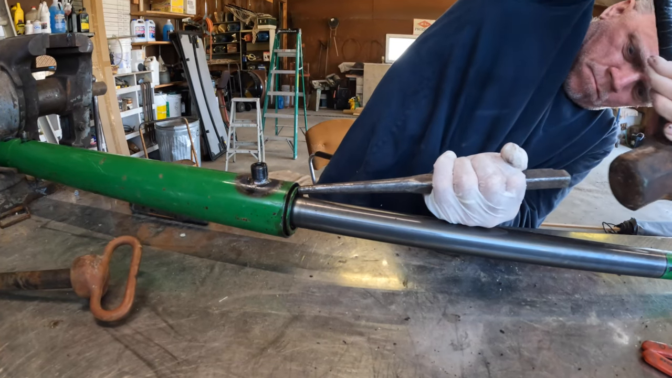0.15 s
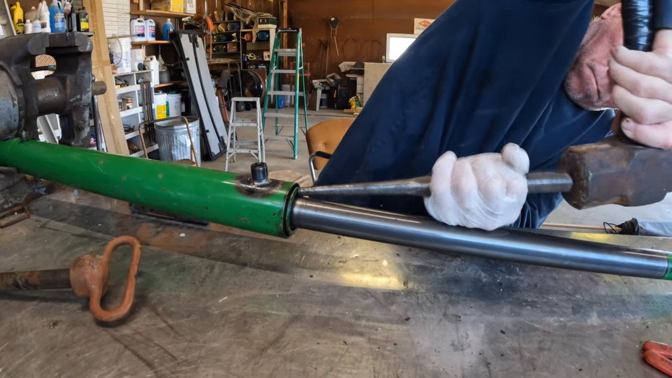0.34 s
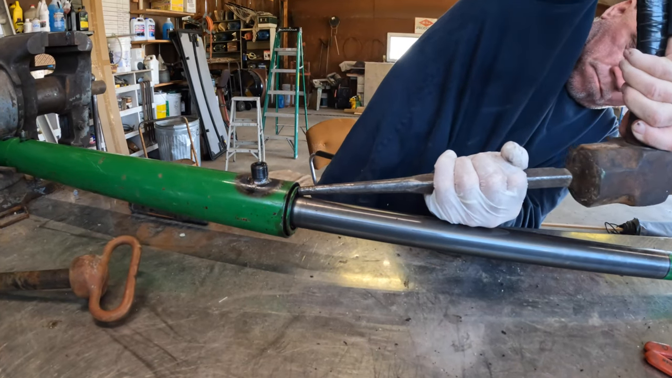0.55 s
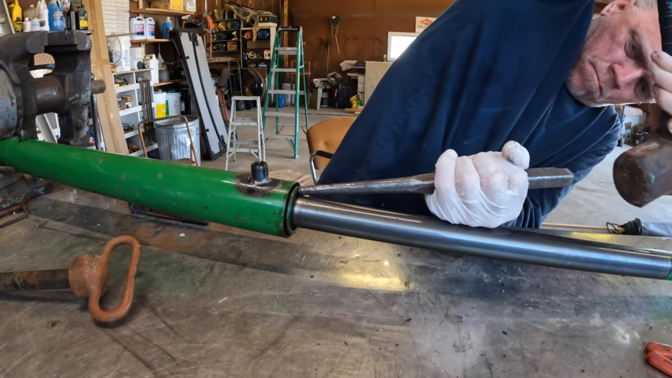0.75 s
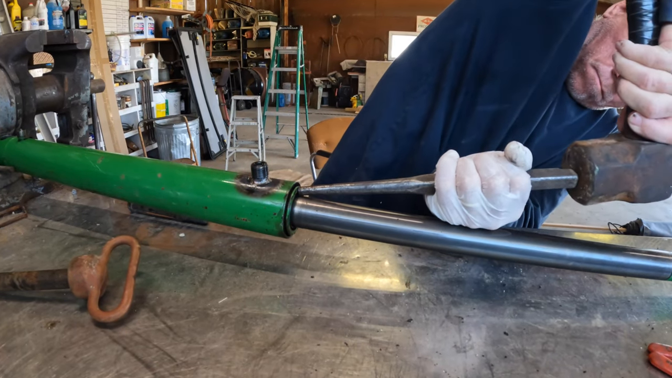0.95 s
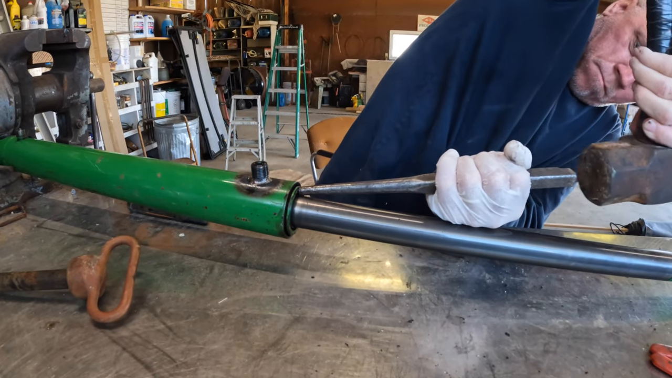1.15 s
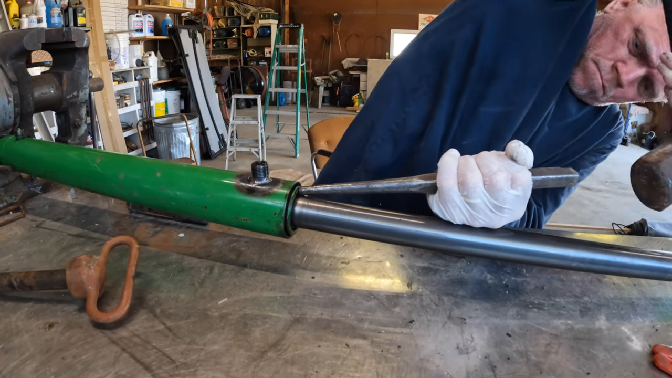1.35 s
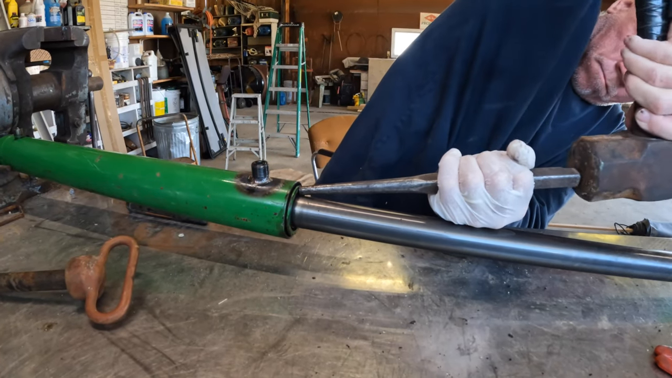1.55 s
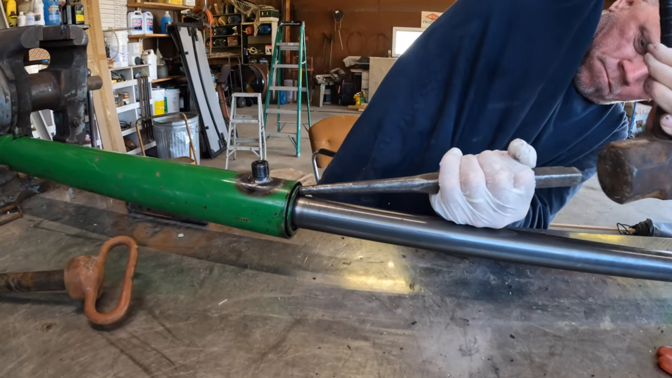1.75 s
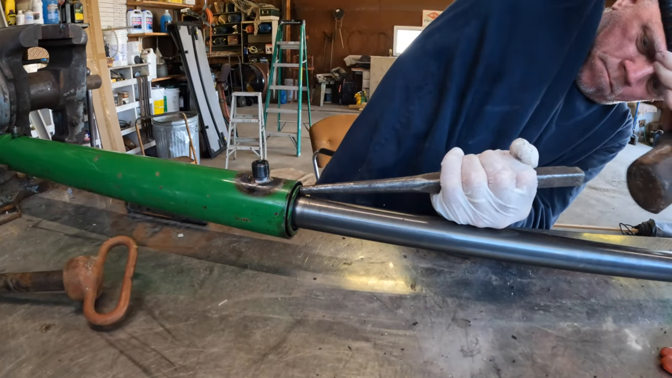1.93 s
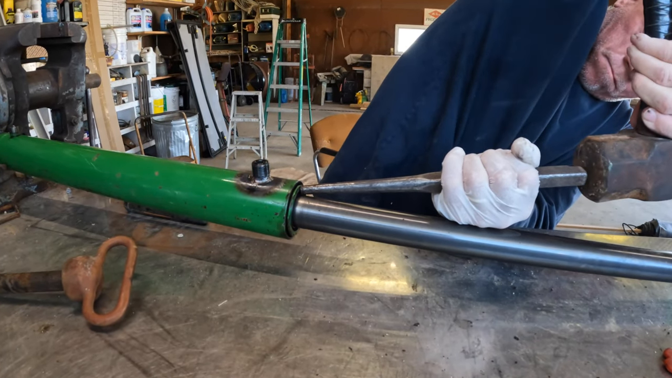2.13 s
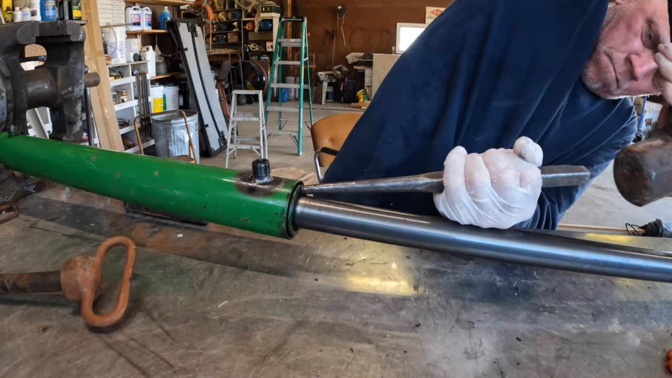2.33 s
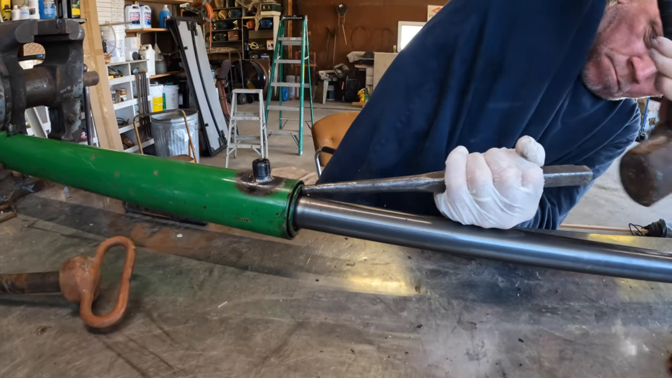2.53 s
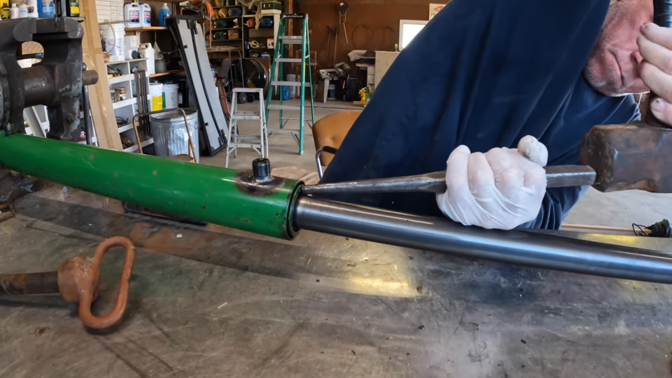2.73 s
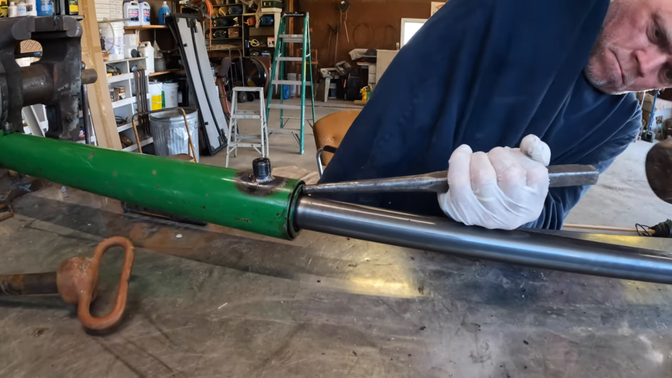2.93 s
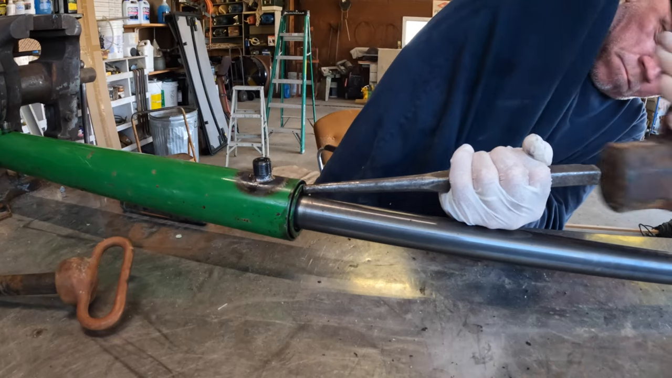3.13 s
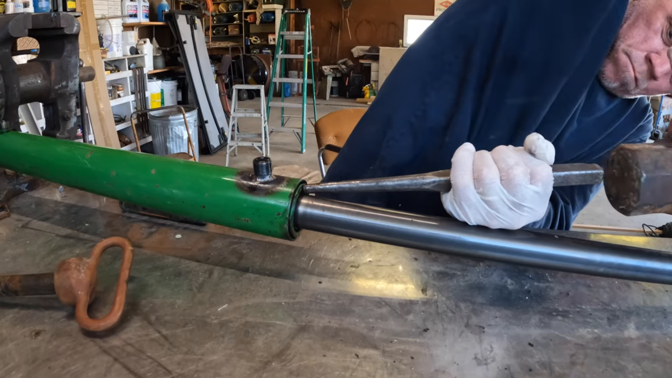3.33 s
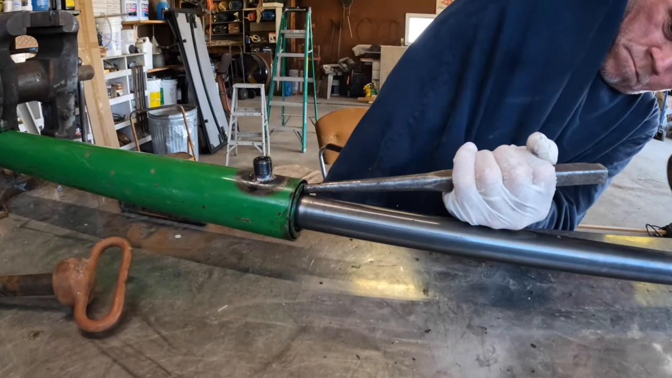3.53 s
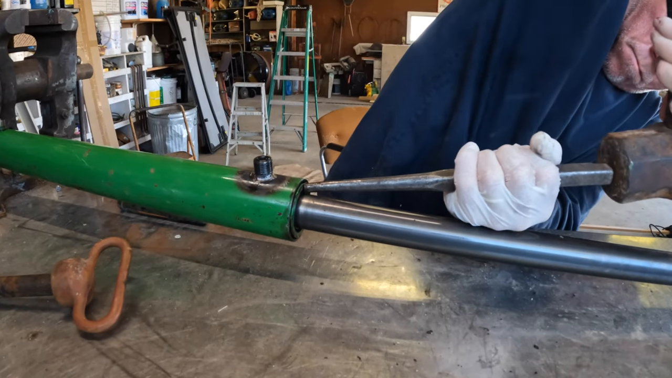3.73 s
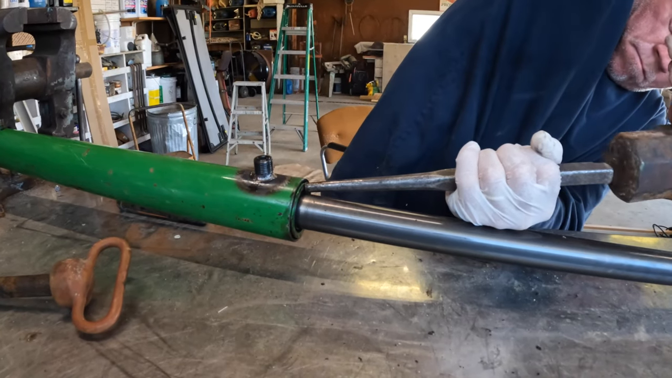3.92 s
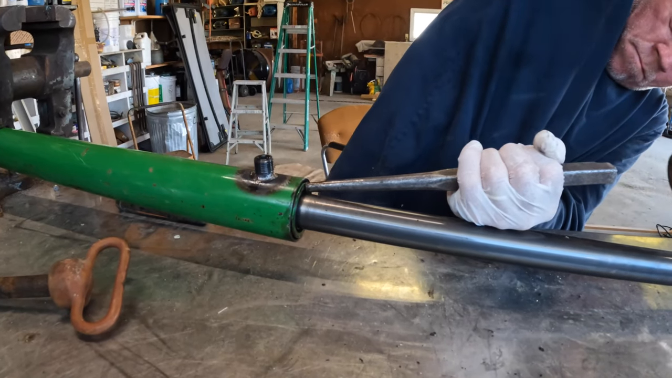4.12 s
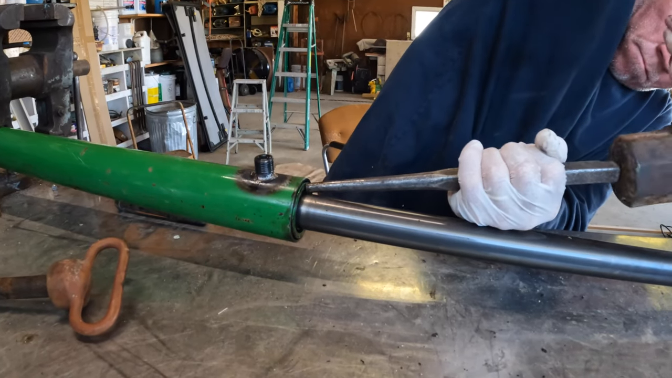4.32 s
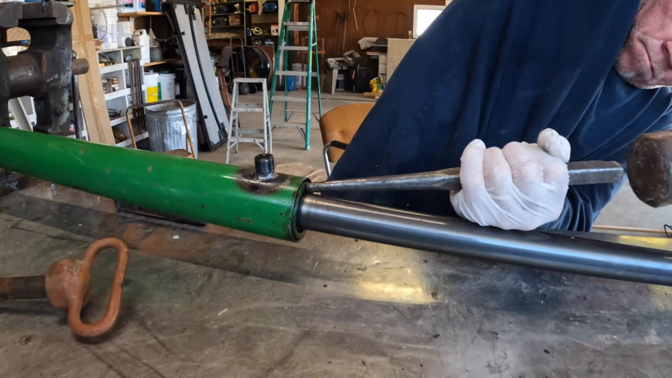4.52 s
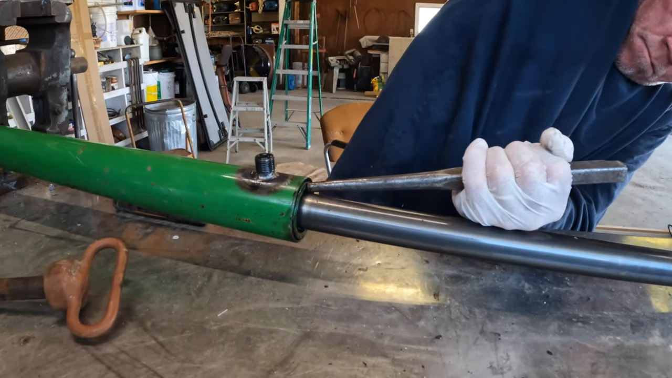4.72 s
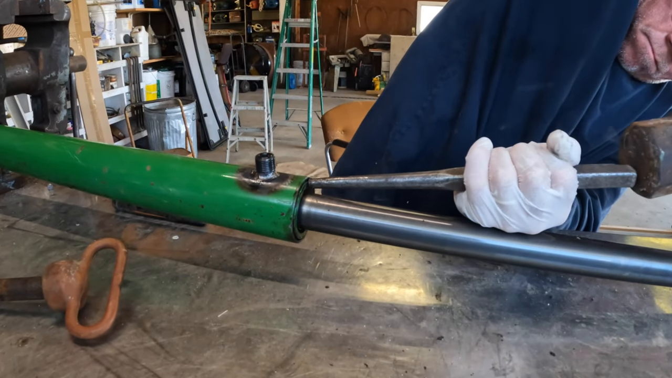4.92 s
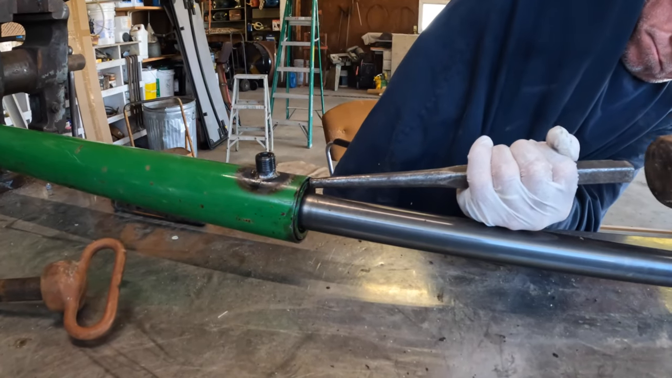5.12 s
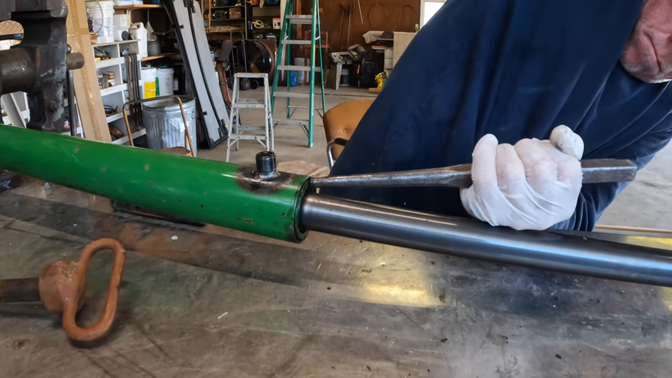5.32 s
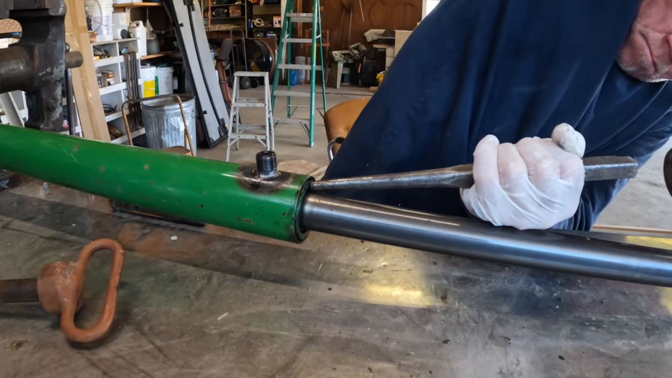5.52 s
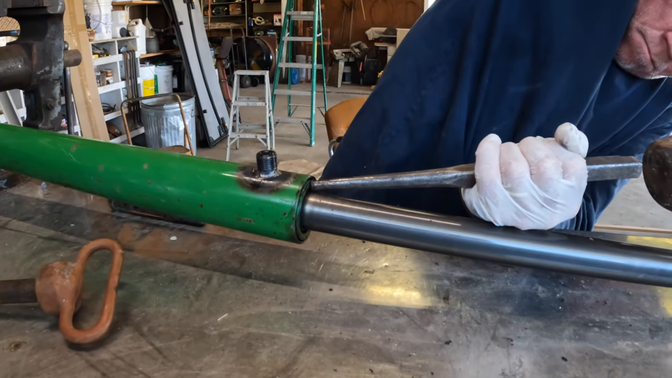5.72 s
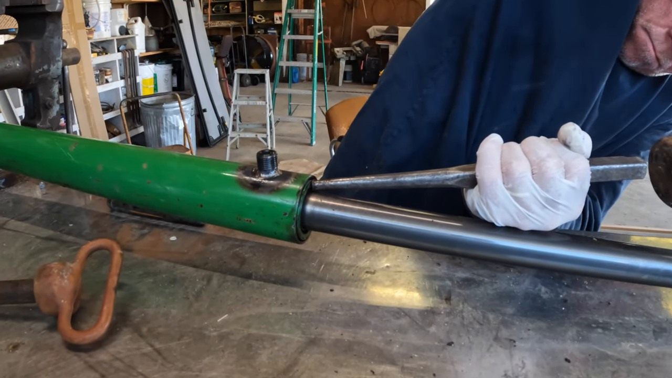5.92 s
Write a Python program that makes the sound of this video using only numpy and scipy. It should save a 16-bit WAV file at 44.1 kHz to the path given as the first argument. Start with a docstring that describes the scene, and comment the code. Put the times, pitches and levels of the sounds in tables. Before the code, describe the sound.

Steady, hard metal-on-metal blows ring and thud on a bench in a large echoing shop, finishing with a faint scrape and a small tap.

```python
"""Large workshop, at a bench: a heavy hammer drives a hand-held steel punch against a hydraulic cylinder's collar.
Each blow is a short noise crack and clank, damped steel modes and a low bench thud; the last is one light tap.
Decaying stereo noise makes the shop's echo, which swells as the recorder's limiter lets go after each blow.
Faint filtered noise adds hammer swish, a scrape of the punch tip before the tap, and the shop's air."""
import sys
import numpy as np
from scipy import signal
from scipy.fft import rfft, irfft, next_fast_len
from scipy.io import wavfile
from scipy.ndimage import uniform_filter1d, minimum_filter1d, map_coordinates

SR = 44100
rng = np.random.default_rng(int(sys.argv[2]) if len(sys.argv) > 2 else 0)


def log_audio(samples):
    """Write samples as a 16-bit WAV file to the path given in sys.argv[1]."""
    # one column per channel
    frames = np.atleast_2d(samples).T
    # limit to full scale, then quantise
    limited = np.clip(frames, -1, 1)
    pcm = np.round(limited * 32767).astype(np.int16)
    wavfile.write(sys.argv[1], SR, pcm)


N = 262836
AGE_S = np.arange(3 * SR // 2) / SR  # time since a blow

# hammer blows: (time [s], force [dB], punch ring [dB], favoured pitch [Hz], its boost [dB])
BLOWS = [(-.085, 4.5, -12, 1100, 4.5), (0.4963, 5.5, 4.5, 7030, 1), (1.0618, 6, -2.5, 10140, 7),
         (1.6145, 6.5, -3.5, 6630, 0.5), (2.1588, 4.5, 1.5, 8850, 2.5), (2.7312, 5, -3.5, 7500, 4),
         (3.2901, 5, 0.5, 8060, 4.5), (3.8490, 5, -1, 5600, 1.5), (4.427, 6, -2.5, 3370, 2),
         (4.9960, 5, 2, 5130, 2), (5.6492, -21.5, -14, 8500, 10)]
# steel-on-steel contact: (frequency [Hz], relative density [dB per Hz])
CRACK = [(200, -17), (900, -10.5), (1700, -9.5), (2450, 0), (3000, -6.5), (4200, -1), (5350, 2.5),
         (6050, -6), (6950, -0.5), (8400, -16), (10000, -19.5), (11000, -29.5), (15500, -29.5)]
# quickly damped clank of barrel and collar: (frequency [Hz], relative density [dB per Hz])
CLANK = [(150, -0.5), (420, 8.5), (560, -0.5), (1300, 3), (1950, -6), (2420, -4), (3000, -7.5), (4300, -5),
         (5300, -9.5), (7200, -5.5), (8600, -18), (10500, -26.5), (14000, -47)]
# clear ring of the punch: (frequency [Hz], mean level [dB], t60 [s])
PUNCH = [(3492, -34.5, .34), (12758, -71, .3), (13436, -62, .26)]
# collar and rod, damped by the bench: (nominal frequency [Hz], mean level [dB], t60 [s])
COLLAR = [(1348, -38.5, 0.18), (1643, -37.5, 0.17), (2410, -40, 0.11), (2453, -37, .11), (3740, -39.5, .11),
          (4230, -41, 0.16), (5170, -38.5, 0.14), (5260, -39.5, .13), (6770, -42.5, .14),
          (7900, -36.5, 0.048), (9930, -51, .14)]
# nearby steel at the two microphone ports: (frequency [Hz], left over right [dB])
PORTS = [(500, 1), (1400, 1), (2500, -1.5), (5000, -2.5), (7600, -2), (9900, 7), (11500, -2), (15000, -6)]
# bench top under the cylinder: (frequency [Hz], relative level [dB], t60 [s])
BENCH = [(170, -16.5, .36), (33, -17.5, .36), (56, -17.5, .34), (76, -20, .36), (91, -18.5, .38),
         (112, -22, .36), (135, -23, .32), (161, -18, .32), (226, -23, .33), (255, -20.5, .32),
         (290, -21, .32), (340, -25, .28), (367, -27, .26), (415, -28, .18)]
# loose things rumbling on the bench: (frequency [Hz], relative density [dB per Hz])
RUMBLE = [(12, -23.5), (30, -4), (90, 2), (170, 2.5), (310, -2), (480, -18.5), (900, -38.5), (2500, -78.5)]
# blow as it spreads all round into the shop: (frequency [Hz], relative density [dB per Hz])
SPREAD = [(200, 4.5), (400, 5.5), (560, 2), (1300, 3.5), (1950, -6.5), (2450, 1), (3050, -7), (4200, 1),
          (5300, -0.5), (6000, -8), (7000, -6.5), (8800, -24), (10200, -22.5), (11600, -35), (16000, -41)]
# workshop decay: (frequency [Hz], t60 [s])
SHOP_T60 = [(50, 2.4), (170, 0.65), (450, 0.85), (1200, 0.75), (3000, 0.75), (5200, 0.67), (8000, 0.52),
            (14000, 0.19)]
# echo width: (frequency [Hz], side over mid [dB])
WIDTH = [(60, -31), (200, -26), (400, -13.5), (1200, -8.5), (2500, -5), (7000, -12), (15000, 5)]
# air rushing round the hammer head: (frequency [Hz], relative density [dB per Hz])
SWISH = [(200, -10), (600, -8), (920, 0), (1300, -12), (4000, -24), (9000, -50)]
# punch tip sliding on the collar: (frequency [Hz], relative density [dB per Hz])
SCRAPE = [(500, -24), (2000, -14), (2450, -11), (3000, -14), (4600, -16), (5200, -4), (5900, -20),
          (12000, -38)]
# still air in the shop: (frequency [Hz], relative density [dB per Hz])
AIR = [(20, -7.5), (90, -2), (300, -11), (1000, -29), (5000, -30.5), (9000, -45.5), (14000, -70)]

FULL_FORCE_DB = 5  # full swing of the hammer
SEAT_TILT_DB_PER_OCTAVE, SEAT_OCTAVES = -0.56, .26  # tilt of a full blow; width of the favoured band
THIN_DB_PER_OCTAVE = 0.06  # extra treble tilt per dB short of a full swing
RING_DB = -1  # steel ring heard directly
THUD_DB, THUD_DB_PER_FORCE_DB = -.1, 0.28  # at a full swing; extra per dB of force
WASH_DB, RING_ECHO_DB, ECHO_LEFT_DB = 4.5, -5.5, 1.7  # echo of the clang, of the ring; left over right
ECHO_DB_PER_FORCE_DB = -0.087  # a light tap leaves relatively more echo


def hammering():
    """Every blow cracks, rings the steel, thuds through the bench and fills the shop, in step with its force."""
    track, thud = np.zeros((2, N)), bench()
    barrel = crowded_modes(depth_db=1.8)
    echo_lean = amp([[ECHO_LEFT_DB / 2], [-ECHO_LEFT_DB / 2]])
    for time_s, force_db, ring_db, pitch_hz, boost_db in BLOWS:
        excess_db = force_db - FULL_FORCE_DB
        seat = seating(force_db, pitch_hz, boost_db)
        ring = coloured(steel(ring_db), seat)
        clang = coloured(contact(), seat)
        direct = panned(clang + amp(RING_DB) * ring, lambda hz: along(PORTS, hz))
        wash = shop_wash(seat, barrel)
        echo = (amp(WASH_DB) * wash + amp(RING_ECHO_DB) * echoed(ring)) * echo_lean
        echo = amp(ECHO_DB_PER_FORCE_DB * excess_db) * echo
        shove = amp(THUD_DB + THUD_DB_PER_FORCE_DB * excess_db) * thud
        add(track, amp(force_db) * (direct + echo + shove), time_s)
    return track


def contact(rise_s=0.00063, crack_db=7.0, crack_t60_s=0.012, clank_db=-14, clank_t60_s=0.078):
    """Hammer, punch and collar chatter for a few milliseconds; the barrel clanks on a little longer."""
    crack = amp(crack_db) * noise(CRACK, side_db=-8.5) * fade(crack_t60_s)
    clank = amp(clank_db) * noise(CLANK, side_db=-7.5) * fade(clank_t60_s)
    return (crack + clank) * swell(rise_s)


def steel(ring_db):
    """The punch keeps its pitch; the collar's modes shift with the way the tip bears on it."""
    punch = amp(ring_db) * ringing(PUNCH, scatter_db=1, detune=0)
    collar = ringing(COLLAR, scatter_db=1.5, detune=.007)
    return punch + collar


def ringing(modes, scatter_db, detune):
    """Damped sines of scattered strength and random phase; detune is the relative spread of pitch."""
    hz, db, t60_s = np.transpose(modes)[:, :, None]
    strength = amp(db + scatter_db * rng.standard_normal(db.shape))
    pitch_hz = hz * (1 + detune * rng.standard_normal(db.shape))
    phase = rng.uniform(0, 2 * np.pi, db.shape)
    waves = np.sin(2 * np.pi * pitch_hz * AGE_S + phase)
    return np.sum(strength * fade(t60_s) * waves, axis=0)


def seating(force_db, pitch_hz, boost_db):
    """Colour of one blow in dB: the tip's seat favours one band, and a light tap sounds thinner."""
    tilt_db = SEAT_TILT_DB_PER_OCTAVE + THIN_DB_PER_OCTAVE * (FULL_FORCE_DB - force_db)

    def gain_db(hz):
        octaves_off = np.log2((hz + 1) / pitch_hz)
        favoured_db = boost_db * np.exp(-(octaves_off / SEAT_OCTAVES) ** 2)
        return favoured_db + tilt_db * np.log2(np.clip(hz, 300, 9000) / 5000)
    return gain_db


def crowded_modes(depth_db, spacing_hz=45):
    """Random gain in dB over frequency: the peaks and gaps of many close resonances."""
    knots_db = depth_db * rng.standard_normal(2048)
    return lambda hz: map_coordinates(knots_db, [hz / spacing_hz], mode="mirror")


def bench(rise_s=0.0015, modes_db=-2.5, rumble_db=-13, rumble_t60_s=0.26, echo_db=-13):
    """The cylinder shoves the bench, whose damped modes answer; neighbouring modes swing opposite ways."""
    modes = np.zeros(len(AGE_S))
    for k, (hz, db, t60_s) in enumerate(sorted(BENCH)):
        modes += (-1) ** k * amp(db) * fade(t60_s) * np.sin(2 * np.pi * hz * AGE_S)
    rumble = amp(rumble_db) * noise(RUMBLE, side_db=-14) * fade(rumble_t60_s)
    thud = (amp(modes_db) * modes + rumble) * swell(rise_s)
    return thud + amp(echo_db) * echoed(thud.mean(axis=0))


def shop_wash(seat, barrel):
    """The walls gather sound from every direction and hold on to the barrel's many modes."""
    chatter = crowded_modes(depth_db=1.3, spacing_hz=260)
    return coloured(workshop(), lambda hz: along(SPREAD, hz) + seat(hz) + barrel(hz) + chatter(hz))


def workshop(wall_s=0.081, spread_s=.014, near=0.36):
    """Diffuse echo, its mid of equal energy in each band: near shelves answer first, then the far walls."""
    hz, t, z = signal.stft(rng.standard_normal((2, len(AGE_S))), SR, nperseg=512)
    shelves = near * swell(0.021, t)
    walls = (1 + np.tanh((t - wall_s) / spread_s)) / 2 * swell(0.11, t)
    decay = fade(along(SHOP_T60, hz)[:, None], t) * (shelves + walls)
    band_rms = np.sqrt(np.mean(decay ** 2, axis=1, keepdims=True) * len(AGE_S))
    mid, side = z * decay / band_rms
    side = side * amp(along(WIDTH, hz))[:, None]
    echo = signal.istft(np.array([mid + side, mid - side]), SR, nperseg=512)[1]
    return echo[:, :len(AGE_S)]


def echoed(x):
    """The workshop's answer to a mono sound, by convolution."""
    return signal.fftconvolve(x[None], workshop(), axes=1)[:, :len(AGE_S)]


def swings(swish_db=-49):
    """Air rushes round the hammer head, loudest just as it lands."""
    track = np.zeros((2, N))
    approach = fade(.15)[::-1]
    for time_s, force_db, *_ in BLOWS:
        swish = amp(force_db + swish_db) * approach * noise(SWISH, side_db=-10.5)
        add(track, swish, time_s - len(AGE_S) / SR)
    return track


def slide(level_db=-63, centre_s=5.58, width_s=.07):
    """The tip scrapes faintly as it is set for the last tap: noise under a bell-shaped stroke."""
    stroke = np.exp(-((np.arange(N) / SR - centre_s) / width_s) ** 2)
    return amp(level_db) * stroke * noise(SCRAPE, side_db=-17, size=N)


def shop_air(level_db=-55.5):
    """Faint steady rumble of the shop: coloured noise."""
    return amp(level_db) * noise(AIR, side_db=-7.5, size=N)


def amp(db):
    """Decibels to gain."""
    return 10 ** (np.asarray(db) / 20)


def unit(x):
    """Scale to rms 1."""
    return x / np.sqrt(np.mean(x ** 2) + 1e-20)


def along(points, hz):
    """(frequency [Hz], value) points read on a log frequency axis."""
    f, v = np.transpose(points)
    return np.interp(np.log(hz + 1), np.log(f + 1), v)


def fade(t60_s, t=AGE_S):
    """Exponential decay, 60 dB in t60_s."""
    return np.exp(-np.log(1000) * t / t60_s)


def swell(rise_s, t=AGE_S):
    """Soft onset with time constant rise_s."""
    return 1 - np.exp(-t / rise_s)


def coloured(x, gain_db):
    """Causal minimum-phase filter; gain_db is a function of frequency."""
    m = 2 * next_fast_len(x.shape[-1] // 2 + 4096)
    cepstrum = irfft(np.log(amp(gain_db(np.fft.rfftfreq(m, 1 / SR)))))
    # fold onto positive time for minimum phase
    cepstrum[1:m // 2] *= 2
    cepstrum[m // 2 + 1:] = 0
    response = np.exp(rfft(cepstrum))
    return irfft(rfft(x, m) * response, m)[..., :x.shape[-1]]


def noise(spectrum, side_db, size=len(AGE_S)):
    """Coloured stereo noise of rms 1."""
    mid, side = coloured(rng.standard_normal((2, size)), lambda hz: along(spectrum, hz))
    side = amp(side_db) * side
    return unit(np.array([mid + side, mid - side]))


def panned(x, left_db):
    """Left over right by left_db, a function of frequency."""
    left = coloured(x[0], lambda hz: left_db(hz) / 2)
    right = coloured(x[1], lambda hz: -left_db(hz) / 2)
    return np.array([left, right])


def add(track, sound, time_s):
    """Mix a sound into the track from time_s on, cut at the track's ends."""
    start = round(time_s * SR)
    part = sound[:, max(-start, 0):N - start]
    track[:, max(start, 0):][:, :part.shape[1]] += part


def scene():
    """Hammering, swings and scrape over the faint rumble of the shop."""
    return hammering() + swings() + slide() + shop_air()


def limiter(x, ceiling_db=-6, release_s=0.12):
    """The gain ducks at once under a loud burst and creeps back."""
    power = uniform_filter1d(np.mean(x ** 2, axis=0), size=64)
    level = np.sqrt(np.abs(power) + 1e-12)
    duck = np.maximum(1 - amp(ceiling_db) / level, 0)
    letting_go = np.exp(-np.arange(N) / SR / release_s)
    held = np.maximum.accumulate(duck / letting_go) * letting_go
    return x * uniform_filter1d(minimum_filter1d(1 - held, size=64), size=32)


def record(dry, fade_out_s=0.097, top_hz=16300):
    """Microphone bass roll-off, limiter, clipping of the sharpest peaks, closing fade and band limit."""
    x = signal.sosfilt(signal.butter(2, 18, "highpass", fs=SR, output="sos"), dry)
    x = np.clip(limiter(x), -1, 1)
    x = x * np.minimum((N - np.arange(N)) / SR / fade_out_s, 1)
    return signal.sosfiltfilt(signal.butter(24, top_hz, fs=SR, output="sos"), x)


dry = scene()
out = record(dry)
log_audio(out)
```